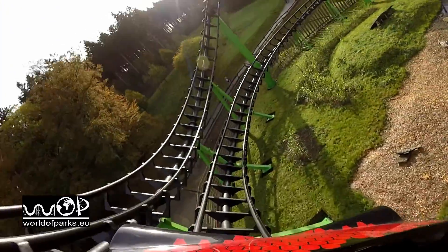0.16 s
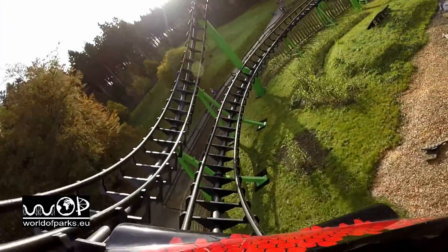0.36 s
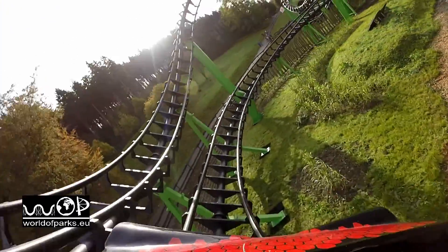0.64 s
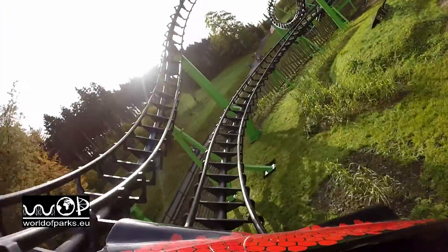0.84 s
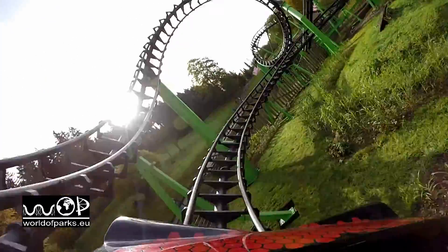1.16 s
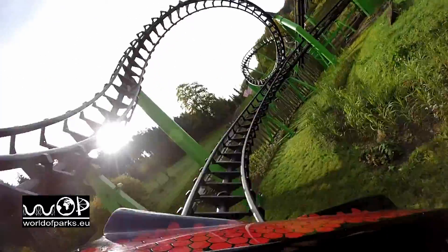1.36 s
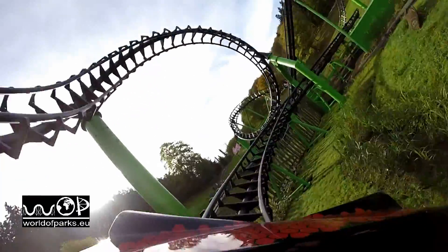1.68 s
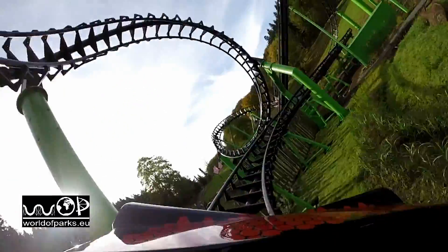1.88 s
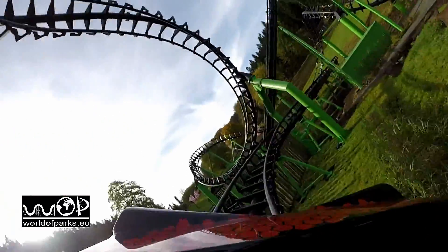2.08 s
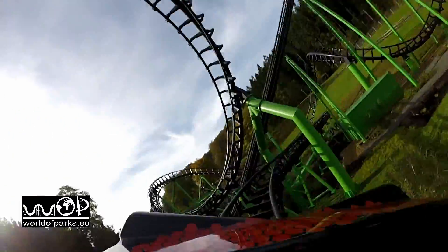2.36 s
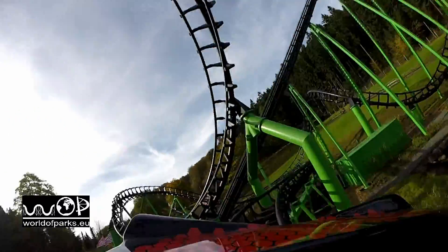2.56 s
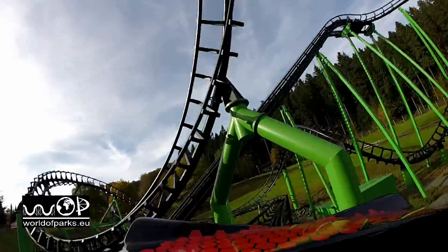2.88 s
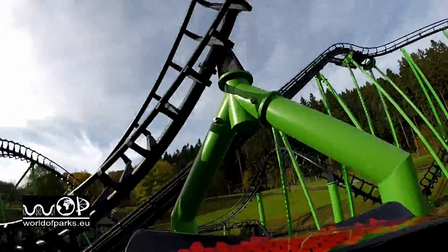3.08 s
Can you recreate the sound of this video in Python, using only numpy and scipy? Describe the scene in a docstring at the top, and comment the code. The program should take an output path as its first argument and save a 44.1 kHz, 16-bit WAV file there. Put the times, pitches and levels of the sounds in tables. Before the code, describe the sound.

A roller coaster car rumbles and thumps along the rails, heard up close from its nose. Wind builds while small parts tick and rattle. After the hardest jolt, a sudden hiss of air sets in.

```python
"""Roller coaster in a banked curve

The microphone rides on a mount fixed to the nose of the car, close to everything, in mono.
The body rumbles and thumps, the wheels roar on the rails and wind rushes past. The mount ticks and
grates under the jolts while loose parts ring. After the hardest jolt a sudden hiss of air sets in
and slowly dulls."""
import sys
import numpy as np
from scipy import signal
from scipy.fft import rfft, irfft, next_fast_len
from scipy.io import wavfile
from scipy.ndimage import uniform_filter1d

SR = 44100
rng = np.random.default_rng(int(sys.argv[2]) if len(sys.argv) > 2 else 0)


def output_pcm(signal):
    """Save a mono or channel-first signal as 16-bit PCM at the path in sys.argv[1].

    Samples are clipped to [-1, 1] before scaling.
    """
    pcm = np.clip(np.atleast_2d(signal).T, -1, 1) * 32767
    wavfile.write(sys.argv[1], SR, np.round(pcm).astype(np.int16))


N = 142002
T = np.arange(N) / SR

# How loud body, chassis, floor and wheels are at the nose. Each row: time in seconds, level in dB.
BODY_LEVELS = [(0, -24.5), (.27, -17.5), (.34, -27), (.54, -16.5), (.62, -22.5), (.93, -26.5), (.98, -15.5),
               (1.29, -21.5), (1.35, -11), (1.47, -14.5), (1.55, -18), (2.0, -17.5), (2.07, -21.5),
               (2.38, -21.5), (2.54, -19), (2.63, -12), (2.84, -16), (2.91, -5.5), (3.14, -20), (3.18, -7),
               (3.22, -21)]
CHASSIS_LEVELS = [(0, -44), (.12, -35.5), (.23, -29), (.36, -32.5), (.46, -29.5), (.64, -37), (.74, -23),
                  (.87, -35.5), (1.08, -30), (1.22, -36), (1.45, -26.5), (1.68, -34.5), (1.8, -24),
                  (1.95, -31.5), (2.16, -31.5), (2.52, -38), (2.7, -24.5), (2.95, -24.5), (3.22, -38)]
FLOOR_LEVELS = [(0, -33.5), (.2, -36), (.38, -36), (.47, -25), (.56, -36.5), (.85, -34), (.96, -35.5),
                (1.3, -32), (1.39, -31.5), (1.52, -30.5), (1.8, -32.5), (1.9, -25), (1.99, -39.5),
                (2.18, -28.5), (2.54, -30.5), (2.7, -24), (2.8, -30.5), (2.9, -28), (3, -33), (3.09, -24.5),
                (3.22, -27)]
WHEEL_LEVELS = [(0, -41), (.1, -49), (.9, -48), (1.3, -45.5), (1.6, -44), (2.2, -41.5), (2.6, -43.5),
                (3, -45), (3.22, -41)]
# The tone of the same four. Each row: frequency in Hz, relative level in dB.
BODY_SPECTRUM = [(10, -14), (20, -0.5), (30, -2), (42, 3.5), (52, 0), (61, -7), (72, -19), (110, -29),
                 (200, -77.5)]
CHASSIS_SPECTRUM = [(50, -19), (68, 2), (82, 0), (100, -2.5), (118, -16.5), (200, -43.5)]
FLOOR_SPECTRUM = [(95, -8), (118, 3), (145, -2.5), (168, -2), (205, -13.5), (260, -24.5), (450, -43.5)]
WHEEL_SPECTRUM = [(130, -2.5), (230, 2), (290, 0.5), (350, 0), (420, -2), (500, -2), (600, -6.5),
                  (680, -4.5), (770, -11), (890, -12.5), (965, -10), (1060, -16), (1600, -36),
                  (4000, -68.5)]
# The wheels sing faintly. Each row: peak time and width in seconds, pitch and bandwidth in Hz, level in dB.
WHEEL_WHINES = [(1.25, .28, 1885, 25, -58), (.98, .17, 5950, 150, -72), (1.262, .02, 5920, 120, -63)]

# The car thumps on the track.
# Each row: start and length of the push in seconds, then levels of push, knock and clatter in dB.
TRACK_THUMPS = [(0.019, 0.0076, -33, -50, -50), (0.436, 0.014, -4.5, -28, -39.5),
                (1.176, .008, -17, -44, -45), (1.426, 0.0086, -20.5, -40, -40.5),
                (1.648, 0.0042, -16, -36.5, -42), (1.888, 0.0062, -26, -38.5, -44),
                (2.162, 0.0079, -9, -37, -36.5), (2.344, 0.0046, -29, -37, -32),
                (2.374, 0.0048, -33, -32, -31), (2.4, 0.021, 2, -34, -31), (2.456, .004, -9.5, -32.5, -47),
                (2.505, 0.0053, -14, -50, -42), (2.698, 0.01, -6.5, -41, -51),
                (3.024, 0.0058, -17, -48, -36), (3.157, 0.0051, -16.5, -37.5, -35)]
# The car's shell and the mount ring. Each row: pitch in Hz, relative level in dB, t60 in seconds.
SHELL_MODES = [(185, 1, .05), (366, -2, .1), (678, -5, .084)]
MOUNT_MODES = [(1380, -12, .012), (1760, -7, .016), (2330, -11, .012), (2640, -6, .018), (4400, -26, .006),
               (6200, -26, .006)]
# The mount ticks, right at the microphone. Each row: start in seconds, levels of ring and snap in dB.
MOUNT_TICKS = [(.1438, -28, -47), (.4308, -29, -46), (.503, -32, -54), (1.887, -30, -53), (2.164, -29, -52),
               (2.349, -29, -55), (2.374, -23, -54), (2.458, -24, -62), (2.983, -18.5, -57),
               (3.169, -24, -57)]
# The mount grates. Each row: start, rise and decay in seconds, level in dB.
MOUNT_GRATES = [(.002, .016, .02, -45), (.433, .003, .05, -43), (2.335, .04, .038, -32.5),
                (2.958, .02, .012, -36.5)]
# A thump's clatter, a tick's snap and the grating. Each row: frequency in Hz, relative level in dB.
CLATTER_SPECTRUM = [(120, -65.5), (200, 10.5), (380, 6), (680, -3), (1000, -4), (1600, -11.5), (4000, -41)]
SNAP_SPECTRUM = [(1200, 3.5), (3000, -3), (4000, 2.5), (7000, 5.5), (9000, -3.5), (11000, -2.5),
                 (14500, -13)]
GRATE_SPECTRUM = [(300, -12), (500, -7), (690, 2), (900, -8), (1080, -4), (1300, -7), (1650, -1),
                  (1950, -2), (2250, 2), (2650, 4), (2920, 2), (3200, -13), (6000, -19), (8000, -34),
                  (10500, -34), (15000, -45)]
# Loose parts ring once each. Each row: start in seconds, pitch in Hz, level in dB, t60 in seconds.
PART_PINGS = [(.026, 404, -32.5, .2), (.436, 3130, -47, .11), (.81, 2450, -39, .03),
              (.938, 1520, -37.5, .025), (1.179, 975, -36, .09), (1.318, 1720, -36.5, .035),
              (1.528, 1340, -35, .025), (2.461, 2110, -34, .035)]

# Strength of the wind on the nose. Each row: time in seconds, level in dB.
WIND_LEVELS = [(0, -56.5), (.25, -55.5), (.88, -53), (.98, -49), (1.4, -50), (1.6, -45.5), (2.3, -45),
               (2.57, -42.5), (2.68, -40.5), (2.98, -41), (3.04, -48.5), (3.22, -36.5)]
# Puffs of air pass the microphone. Each row: peak time and width in seconds, level in dB.
AIR_PUFFS = [(1.11, .015, -56), (1.61, .018, -54), (2.105, .018, -52), (2.358, .013, -46.5)]
# The wind's rush, the fine airstream and the air jet. Each row: frequency in Hz, relative level in dB.
RUSH_SPECTRUM = [(700, -26.5), (1200, 0), (1420, 5), (1700, 4.5), (1900, -0.5), (2150, 2), (2700, -0.5),
                 (3050, -5.5), (3700, -12), (4400, -14), (6100, -17), (7900, -40.5), (15000, -59)]
AIRSTREAM_SPECTRUM = [(2500, 6), (3300, 4), (4300, 1.5), (5100, -2.5), (6050, -2.5), (7000, -6),
                      (7900, -11.5), (10000, -11.5), (12000, -18), (15000, -28)]
JET_SPECTRUM = [(1200, -48), (2200, -5.5), (3050, 5), (3700, -5), (4350, 6), (4850, 1.5), (5300, 5.5),
                (6100, 4), (7000, -2.5), (8100, -12), (10200, -6.5), (12000, -15.5), (15000, -23)]

AIRSTREAM_DB, AIRSTREAM_FOLLOWS = -57.5, 0.24   # rms level; share of the wind's swing in dB
LEAK_S, LEAK_DB = 2.575, -12.5   # a faint leak comes first; its level is relative to the jet
JET_START_S, JET_ATTACK_S, JET_HOLD_S, JET_DB = 2.618, 0.028, 0.27, -37
JET_FALL_DB_PER_S, DULL_DB_PER_S_PER_OCTAVE, DULL_ABOVE_HZ = 13.5, 24.5, 4940
TICK_SPREAD_DB, SLIPS_PER_S = 1.5, 900
RATTLES_PER_S, RATTLE_SPREAD_DB = 150, 3.5
CUTOFF_HZ = 15100


def car_rumble():
    """Just behind the microphone the body shakes, the chassis drones and the floor booms."""
    body = steadied(noise(BODY_SPECTRUM, flutter_db=-2, rate_hz=9.3), window_s=0.0713)
    chassis = steadied(noise(CHASSIS_SPECTRUM, flutter_db=4, rate_hz=19), window_s=0.025)
    floor = steadied(noise(FLOOR_SPECTRUM, flutter_db=1, rate_hz=30), window_s=0.06)
    return level(BODY_LEVELS) * body + level(CHASSIS_LEVELS) * chassis + level(FLOOR_LEVELS) * floor


def thumps():
    """Each jolt from the track is a rounded push with a rebound, a knock in the shell and a dull clatter."""
    push = blows = clatter = 0
    for start, length, push_db, knock_db, clatter_db in TRACK_THUMPS:
        push += from_db(push_db) * np.sin(np.pi * np.clip((T - start) / length, 0, 1)) ** 2
        blows += from_db(knock_db) * click(start + length / 2)
        clatter += from_db(clatter_db) * burst(start, rise_s=0.0044, decay_s=0.013)
    push_and_rebound = signal.sosfilt(signal.butter(1, 20, "high", fs=SR, output="sos"), push)
    clatter *= colour(rng.standard_normal(N), CLATTER_SPECTRUM)
    return push_and_rebound + struck(blows, SHELL_MODES) + clatter


def wheels():
    """The wheels roar on the rails below, and their narrow resonances swell and fade."""
    roar = level(WHEEL_LEVELS) * noise(WHEEL_SPECTRUM, flutter_db=2, rate_hz=25)
    whines = 0
    for peak, width, hz, bandwidth_hz, db in WHEEL_WHINES:
        t60 = np.log(1000) / (np.pi * bandwidth_hz)
        resonance = rms_one(ring(rng.standard_normal(N), hz, t60))
        whines += from_db(db) * swell(peak, width) * steadied(resonance, window_s=0.071)
    return roar + whines


def wind():
    """Turbulent air rushes past, with the car's rattle in it, a steadier hiss above and brighter puffs."""
    force = level(WIND_LEVELS)
    rush = from_db(-3) * noise(RUSH_SPECTRUM, flutter_db=1.9, rate_hz=18)
    rattling = from_db(-8) * rattle()
    puffs = sum(from_db(db) * swell(peak, width) for peak, width, db in AIR_PUFFS)
    airstream = from_db(AIRSTREAM_DB) * rms_one(force ** AIRSTREAM_FOLLOWS)
    fine_hiss = np.hypot(airstream, puffs) * noise(AIRSTREAM_SPECTRUM, flutter_db=1.05, rate_hz=30)
    return force * (rush + rattling) + fine_hiss


def air_jet():
    """Air leaks faintly, then a hissing jet opens, holds and dies away, the higher bands first."""
    leak = from_db(LEAK_DB) * ramp(LEAK_S, rise_s=0.006)
    opening = leak + ramp(JET_START_S, JET_ATTACK_S)
    age = np.maximum(T - JET_START_S - JET_ATTACK_S, 0)
    strength = from_db(JET_DB - JET_FALL_DB_PER_S * np.maximum(age - JET_HOLD_S, 0))
    remaining = noise(JET_SPECTRUM, flutter_db=0, rate_hz=79)
    hiss = 0
    for hz in np.geomspace(5000, 13000, 7):   # peel off bands from the bottom up
        band = signal.sosfiltfilt(signal.butter(6, hz, fs=SR, output="sos"), remaining)
        remaining = remaining - band
        octaves_up = max(np.log2(hz / DULL_ABOVE_HZ), 0)
        dulling = from_db(-DULL_DB_PER_S_PER_OCTAVE * age * octaves_up)
        hiss += band * dulling
    hiss += remaining * dulling   # the very top fades with the last band
    return hiss * opening * strength


def mount():
    """The microphone mount ticks with a snap and a short ring, never quite alike, and at times grates."""
    rings = snaps = 0
    for start, ring_db, snap_db in MOUNT_TICKS:
        modes = [(hz, ring_db + db + rng.normal(0, TICK_SPREAD_DB), t60) for hz, db, t60 in MOUNT_MODES]
        rings += struck(click(start), modes)
        snaps += from_db(snap_db) * burst(start, rise_s=0.00068, decay_s=0.0012)
    rubbing = sum(from_db(db) * burst(start, rise, decay) for start, rise, decay, db in MOUNT_GRATES)
    return rings + snaps * colour(rng.standard_normal(N), SNAP_SPECTRUM) + rubbing * grating()


def grating():
    """Friction in the mount: dense uneven slips and smooth rubbing in equal parts; rms about 1."""
    slips = rng.standard_normal(N) * (rng.random(N) < SLIPS_PER_S / SR)
    friction = rms_one(slips) + rng.standard_normal(N)
    return steadied(colour(friction, GRATE_SPECTRUM), window_s=0.015)


def loose_parts():
    """Small parts are jogged and ring at their own pitch, chattering in their seats."""
    rings = sum(from_db(db) * ramp(start, rise_s=0.0015) * ring(click(start), hz, t60)
                for start, hz, db, t60 in PART_PINGS)
    chatter = 1 + 0.3 * drift(rate_hz=120)
    return rings * chatter


def rattle():
    """Small random contacts in the car, each ringing briefly at one of many pitches; rms 1."""
    sizes = from_db(RATTLE_SPREAD_DB * np.minimum(rng.exponential(1, N), 3))
    signs = rng.choice([-1, 1], N)
    contacts = sizes * signs * (rng.random(N) < RATTLES_PER_S / SR)
    pitches_hz = np.geomspace(1364, 2743, 20)
    pitch_index = rng.integers(0, len(pitches_hz), N)
    rings = sum(ring(contacts * (pitch_index == k), hz, t60=0.035) for k, hz in enumerate(pitches_hz))
    return colour(rings, RUSH_SPECTRUM)


def from_db(db):
    """Decibels to gain."""
    return 10 ** (np.asarray(db) / 20)


def rms_one(x):
    """Scale to unit rms."""
    return x / np.sqrt(np.mean(x ** 2) + 1e-20)


def level(rows):
    """Gain over time from rows of time in seconds and level in dB."""
    return from_db(np.interp(T, *np.transpose(rows)))


def drift(rate_hz):
    """A smooth random wander, mostly slower than rate_hz; rms about 1."""
    step, settling = 40, 2000   # samples per step; steps for the filter to settle
    pole = np.exp(-2 * np.pi * rate_hz * step / SR)
    draws = rng.standard_normal(N // step + settling + 2)
    slow = signal.lfilter([1], [1, -2 * pole, pole * pole], draws)[settling:]
    return np.interp(np.arange(N) / step, np.arange(len(slow)), rms_one(slow))


def colour(x, spectrum):
    """Filter a sound by a spectrum that falls away beyond its ends; rms 1."""
    size = next_fast_len(N)
    hz = np.maximum(np.arange(size // 2 + 1) * SR / size, 1)
    points_hz, db = np.transpose(spectrum)
    shape = from_db(np.interp(np.log(hz), np.log(points_hz), db))
    skirts = np.minimum(1, np.minimum(hz / points_hz[0], points_hz[-1] / hz)) ** 2
    return rms_one(irfft(rfft(x, size) * skirts * shape, size)[:N])


def noise(spectrum, flutter_db, rate_hz):
    """Coloured noise whose level flutters; rms 1."""
    return colour(rng.standard_normal(N) * from_db(flutter_db * drift(rate_hz)), spectrum)


def steadied(x, window_s):
    """Even out the slow swells of a noise."""
    power = uniform_filter1d(x ** 2, int(window_s * SR))
    return x / np.sqrt(power + 1e-3)


def ramp(start_s, rise_s):
    """A straight rise from 0 to 1, then held."""
    return np.clip((T - start_s) / rise_s, 0, 1)


def burst(start_s, rise_s, decay_s):
    """Straight rise, exponential fall."""
    return ramp(start_s, rise_s) * np.exp(-np.maximum(T - start_s - rise_s, 0) / decay_s)


def swell(peak_s, width_s):
    """A bell-shaped rise and fall."""
    return np.exp(-0.5 * ((T - peak_s) / width_s) ** 2)


def click(start_s):
    """A unit click at the given time."""
    return np.arange(N) == int(start_s * SR)


def ring(clicks, hz, t60):
    """A unit click sets a sine of height 1 ringing; it falls 60 dB in t60 seconds."""
    radius = np.exp(-np.log(1000) / (t60 * SR))
    angle = 2 * np.pi * hz / SR
    return signal.lfilter([0, np.sin(angle)], [1, -2 * radius * np.cos(angle), radius ** 2], clicks + 1e-18)


def struck(clicks, modes):
    """Clicks ring a table of modes, alternating in polarity."""
    return sum((-1) ** k * from_db(db) * ring(clicks, hz, t60) for k, (hz, db, t60) in enumerate(modes))


def scene():
    """Everything meets at the one microphone on the nose and goes to both channels alike."""
    mono = car_rumble() + wheels() + wind() + air_jet() + mount() + thumps() + loose_parts()
    return np.tile(mono, (2, 1))


def record(dry):
    """The highest peaks are rounded and the top treble is cut."""
    rounded = dry / (1 + dry ** 8) ** (1 / 8)
    return signal.sosfilt(signal.ellip(10, 0.1, 80, CUTOFF_HZ, fs=SR, output="sos"), rounded)


dry = scene()
out = record(dry)
output_pcm(out)
```